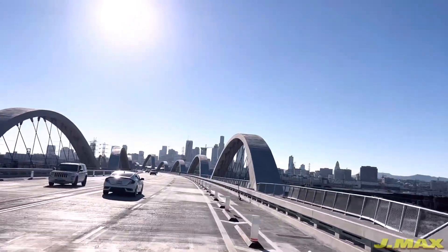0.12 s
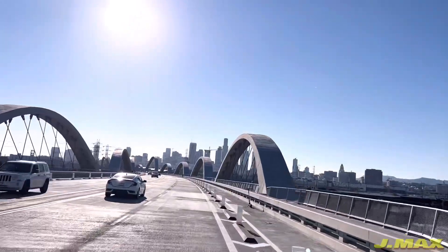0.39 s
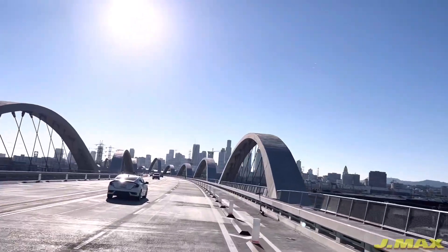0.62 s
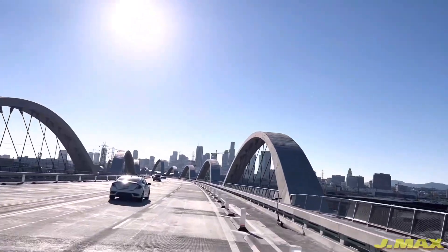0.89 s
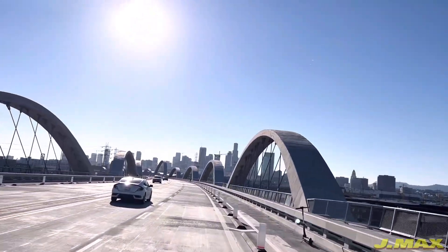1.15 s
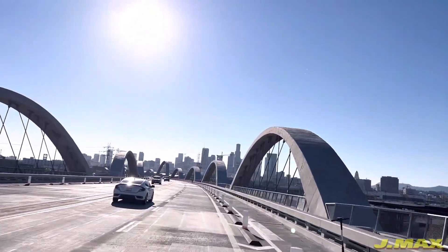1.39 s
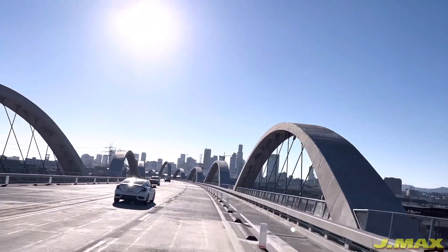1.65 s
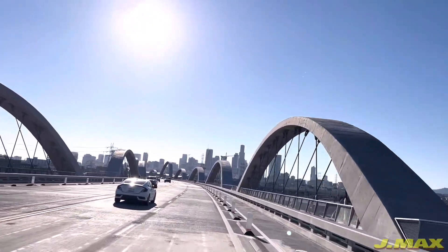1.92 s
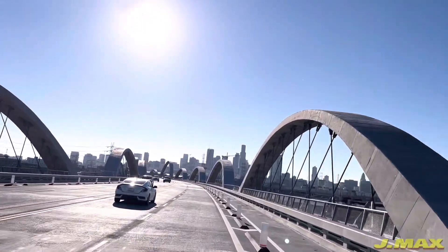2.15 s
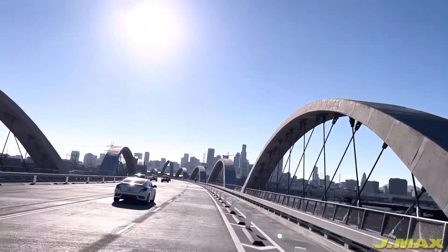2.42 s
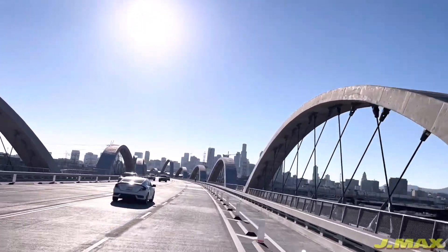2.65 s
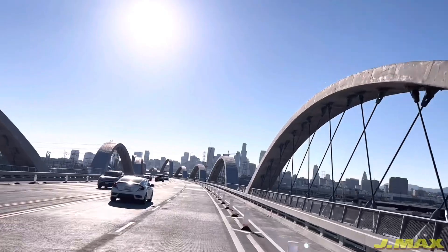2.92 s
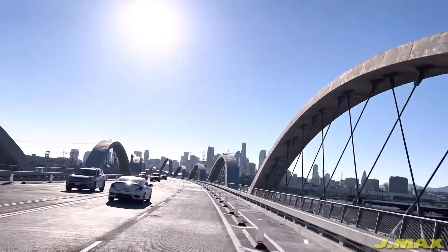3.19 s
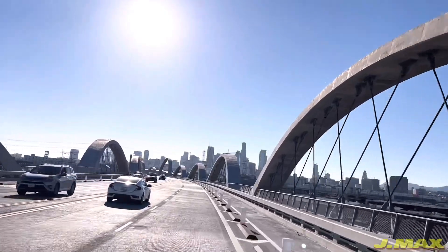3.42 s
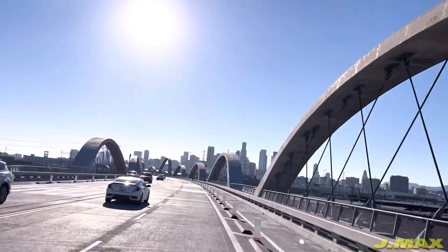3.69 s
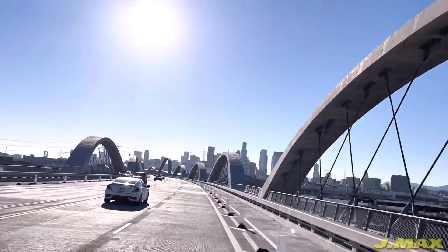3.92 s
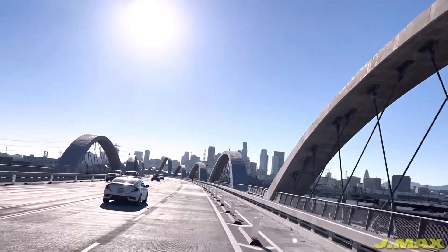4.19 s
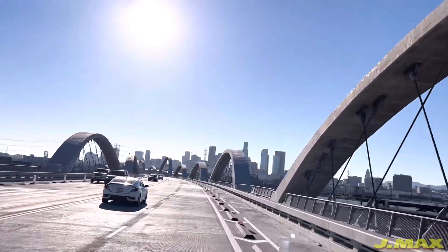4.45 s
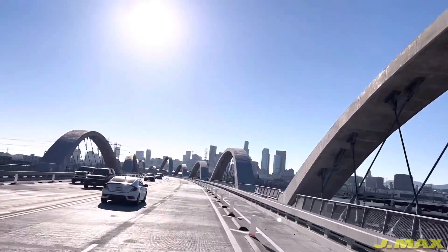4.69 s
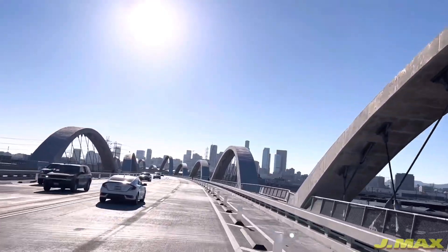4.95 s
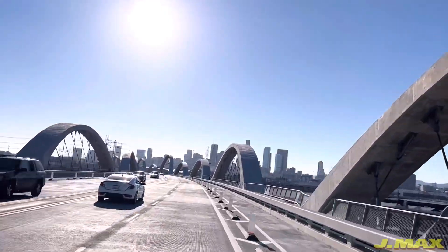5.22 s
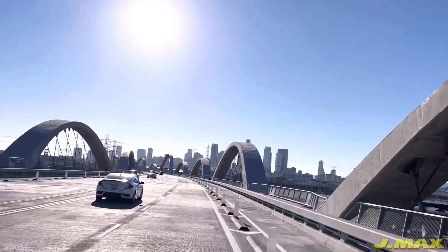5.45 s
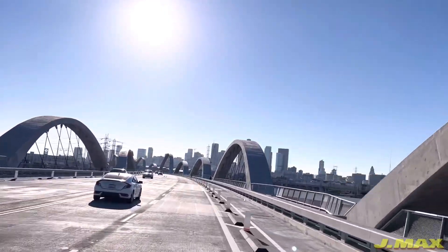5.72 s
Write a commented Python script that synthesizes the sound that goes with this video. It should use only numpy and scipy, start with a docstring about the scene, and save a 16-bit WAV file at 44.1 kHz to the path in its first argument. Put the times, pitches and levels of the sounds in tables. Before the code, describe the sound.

For nearly six seconds, wind streams across a small two-port microphone on a car driving at steady speed over an open bridge. Deep rumble and ragged low-mid buffeting dominate, very close and without audible echo. Underneath lie quiet, smooth tyre and air hiss and faint, unsteady narrow whistles that sink slightly around 1.4 to 1.8 s and climb towards 2.8 s. Irregular bass lumps thump from the start, with a cluster of puffs and clicks at 0.5 to 0.7 s; the bass briefly drops near 1.0 s. Thuds gather from 1.5 s. Around 2.8 s a strong gust swells, the hiss brightens, and thuds, puffs and crackles crowd together until about 3.6 s while the bass begins to spread across the stereo field. Another heavy rumble comes near 3.9 s, with short dips around 4.3 s. Activity thins around 4.7 to 5.1 s, then dull thuds return and the wind continues to the end.

```python
"""Wind streams over a two-port microphone on a car crossing a bridge at steady speed.
From the start, shaped noise gives a centred bass rumble, buffeting, tyre and air hiss and faint edge whistles.
Large eddies soon thud as single bass lumps; small ones burst on the ports as puffs of noise and clusters of
clicks, and middle-sized ones land as dull thuds. The final stage keeps the bass centred, and from about 2.7 s
lets it widen between the channels."""
import sys
import numpy as np
from scipy import signal
from scipy.fft import rfft, irfft, next_fast_len
from scipy.io import wavfile
from scipy.ndimage import uniform_filter1d

SR = 44100
rng = np.random.default_rng(int(sys.argv[2]) if len(sys.argv) > 2 else 0)


def bounce(signal):
    """Save signal as a 16-bit WAV file at the path given by the first command-line argument."""
    frames = np.transpose(np.atleast_2d(signal))
    limited = np.clip(frames, -1, 1)
    pcm = np.round(limited * 32767).astype(np.int16)
    wavfile.write(sys.argv[1], SR, pcm)


def volts_from_db(level):
    """Convert decibel levels to linear amplitude ratios."""
    exponent = np.asarray(level, float) / 20
    return 10 ** exponent


N = 257588
TIMES = np.arange(N) / SR   # s
SIZE = next_fast_len(N)
HZ = np.maximum(np.arange(SIZE // 2 + 1) * SR / SIZE, 1)
SWEEP_CYCLES = 1.179   # an eddy passes from small to large: each pitch comes this many of its own cycles late

# Spectrum of pressure from large eddies. Each row: frequency in Hz, relative density in dB per Hz.
RUMBLE_SPECTRUM = [(12, -44), (20, -24), (46, 1), (70, 5), (94, 2), (221, -10.5), (300, -14), (390, -16),
                   (660, -120)]
# Strong eddies bursting on the ports. Each row: time in seconds, puff level in dB at 800 Hz,
# puff brightness in dB per octave, snap level in dB, crack level in dB (both before single clicks are scaled).
EDDY_BURSTS = [(0.125, -31, -1, -19, -34), (0.347, -34, -2, -14, -35), (0.529, -43, -10, -34, -25),
               (0.575, -44, 12, -38, -33), (0.61, -30, 4.5, -23, -32), (0.641, -27, -2, -18, -36),
               (0.724, -22.5, -4.5, -18, -24), (1.198, -24.5, -2.5, -29, -37), (1.293, -29, 4, -30, -35),
               (1.673, -39, -4, -12, -40), (1.717, -30, -11, -14, -41), (1.815, -30, 0, -13, -40),
               (1.939, -28, -8, -16.5, -47), (2.248, -24, 0, -20, -30), (2.473, -18, -1, -22, -29),
               (2.606, -19, -1, -28, -16), (2.765, -28, -8, -7, -30), (2.869, -24, -9, -11, -20),
               (2.911, -21, -0.5, -14, -32), (2.982, -42, -5, -13, -36), (3.097, -22, -1, -25, -32),
               (3.174, -33, -15, -20, -22), (3.257, -22, -1.5, -16, -14.5), (3.322, -41, -16, -12.5, -25),
               (3.419, -26, 5, -20, -25), (3.491, -20, -3, -26, -37), (3.555, -25.5, 1, -20, -28),
               (3.73, -26, 1.5, -20, -40), (3.854, -31, -6, -29, -36), (3.914, -25.5, -6, -9, -16),
               (4.148, -28, -6, -12, -20), (4.3, -24, -5, -9.5, -27), (4.362, -28, 2, -23, -32),
               (4.374, -40, 10, -6, -17), (4.49, -46, 12, -23, -27), (4.595, -29.5, 5, -10, -19.5),
               (4.968, -24, -3, -19.5, -32), (5.126, -33, -8, -26, -34), (5.288, -35, -14, -17, -35),
               (5.436, -25.5, -3, -35, -35), (5.687, -25.5, -8.5, -16.5, -33)]


def rms_one(x):
    """Normalisation: scale to rms 1."""
    return x / np.sqrt(np.mean(x ** 2) + 1e-20)


def at_hz(points):
    """Spectral envelope: a table interpolated on a log-frequency axis."""
    hz, value = np.transpose(points)
    return np.interp(np.log(HZ), np.log(hz), value)


def drift(corner_hz):
    """Low-passed noise of spread 1: two equal one-pole filters, run in, at a twentieth of the sample rate."""
    pole = np.exp(-40 * np.pi * corner_hz / SR)
    noise = rng.standard_normal(N // 20 + 2002)
    slow = signal.lfilter([1], [1, -2 * pole, pole * pole], noise)[2000:]
    return np.interp(np.arange(N) / 20, np.arange(len(slow)), rms_one(slow))


def octave_band(centre_hz, size=1):
    """Filter bank: overlapping bands, `size` octaves apart, whose gains add up to one."""
    distance = np.clip(np.log2(HZ / centre_hz) / size, -1, 1)
    return np.cos(np.pi / 2 * distance) ** 2


def bump(s, width_s, rise=1):
    """Gaussian pulse of height 1 and standard deviation width_s; its rising side is scaled by `rise`."""
    out = np.zeros(N)
    near = slice(max(round((s - .1) * SR), 0), round((s + .1) * SR))
    late = np.arange(near.start, min(near.stop, N)) / SR - s
    out[near] = np.exp(-.5 * (late / np.where(late < 0, rise, 1) / max(width_s, .002)) ** 2)
    return out


def sweep(middle_hz):
    """Dispersion: from 0.3 to 4 times the middle pitch, low pitches are delayed and high ones hastened."""
    ratio = np.clip(HZ / middle_hz, .3, 4)
    return np.exp(-2j * np.pi * SWEEP_CYCLES * (np.log(ratio) - HZ / middle_hz))


def on_channels(near, other):
    """Partial coherence: the channels share one sound, shifted in phase; the right adds an unrelated one."""
    # Likeness of the channels: that of the two ports up to 9.5 kHz; above, mostly nearly alike, with the
    # phase flat over whole bands. Each row: frequency in Hz, likeness from 0 to 1, lead of the right in radians.
    channel_coherence = [(250, .97, .01), (400, .45, .5), (700, .33, 3.0), (1150, .82, 5.1),
                         (1500, .2, 6.4), (2000, .42, 7.3), (2500, .2, 6.7), (2750, .3, 9.4),
                         (3100, .22, 10.3), (3550, .35, 12.0), (4100, .6, 12.1), (4650, .35, 12.3),
                         (4950, .2, 13.5), (5400, .35, 15.2), (5750, .1, 18.5), (6500, .45, 18.1),
                         (7200, .1, 21.5), (8400, .55, 24.9), (9500, .4, 27.3), (9700, .97, 28.2),
                         (10800, .97, 28.3), (11100, .5, 30.0), (11600, .95, 31.3), (12800, .95, 31.5),
                         (13200, .96, 34.5), (14500, .96, 34.6), (14800, .5, 36.2), (15100, .95, 37.7)]
    # Balance of the channels. Each row: frequency in Hz, level of the left over the right in dB.
    channel_balance = [(300, -0.5), (600, -0.2), (1000, 0.5), (2000, -3.5), (4000, -2), (5500, -0.2),
                       (8000, -2.5), (12000, -0.5)]
    hz, alike, lead = np.transpose(channel_coherence)
    alike, lead = np.interp(HZ, hz, alike), np.interp(HZ, hz, lead)
    left, unrelated = rfft(near, SIZE), rfft(other, SIZE)
    right = alike * left * np.exp(1j * lead) + np.sqrt(1 - alike ** 2) * unrelated
    return np.array([left, right]) * volts_from_db(at_hz(channel_balance) * [[.5], [-.5]])


def channel_noise():
    """Partly coherent noise: spectra of white noise on the two channels."""
    return on_channels(*rng.standard_normal((2, SIZE)))


def coloured(trains, spectrum, phase=1):
    """Impulse response: clicks take on a colour, of peak 1 if undispersed, and reach both channels."""
    colour = volts_from_db(at_hz(spectrum))
    return irfft(on_channels(*trains) * colour * phase, SIZE)[:, :N] / irfft(colour, SIZE)[0]


def scattered(level_db, per_s, spread_db):
    """Random point process: clicks at chance moments, mostly small, a few large."""
    born = rng.random(N) < per_s / SR
    sizes = volts_from_db(level_db + spread_db * np.minimum(rng.exponential(1, N), 3))
    return born * sizes * rng.choice([-1, 1], (2, N))


def rumble(level_db):
    """Near-field coherence: large eddies press on both ports almost alike, with their swell partly evened."""
    evenness, apart_db, pan_db = 0.22, -19, -1.4   # exponent; difference signal; left over right
    white = rng.standard_normal((2, SIZE))
    mid, side = irfft(rfft(white) * volts_from_db(at_hz(RUMBLE_SPECTRUM)), SIZE)[:, :N]
    mid = rms_one(mid)
    power = uniform_filter1d(uniform_filter1d(mid ** 2, size=1800), size=1800)
    swell = np.sqrt(power + .01)
    mid = rms_one(mid / swell ** evenness)
    apart = volts_from_db(level_db + apart_db) * rms_one(side) * [[1], [-1]]
    both = lumps(mid * volts_from_db(level_db)) + apart
    return both * volts_from_db(pan_db * np.array([[.5], [-.5]]))


def buffeting(level_db):
    """Turbulent pressure: small eddies modulate noise band by band, and strong ones add short puffs."""
    # Spectrum of the buffeting. Each row: frequency in Hz, relative density in dB per Hz.
    buffet_spectrum = [(120, -4.5), (200, -3), (400, 0.5), (750, 1.5), (1000, -2), (1400, -6.5),
                       (2000, -15.5), (2600, -21.5), (2750, -25), (3200, -27.5), (5000, -60), (9000, -70)]
    # Colour of the buffeting. Each row: time in seconds, brightness in dB per octave around 800 Hz.
    buffet_brightness = [(0, 1), (1, 1.5), (2, -0.5), (3, 0.5), (3.5, 2), (4.301, 0), (5, 0), (5.84, 2.2)]
    shared_db, own_db, side_db = 0.22, 2.5, 0.97   # swell of all bands, of each band, of each port
    puff_s, puff_lag_s = 0.012, 0.0026   # standard deviation of the fall; centre after the listed time
    puff_rise, dullest_octave = .45, -1.2   # rise as a share of the fall; puff tilt stops this far from 800 Hz
    colour = channel_noise() * volts_from_db(at_hz(buffet_spectrum))
    norm = np.sqrt(np.mean(irfft(colour, SIZE) ** 2))
    gusts = shared_db * (drift(30.0) + 0.22 * drift(34.0))
    sides = side_db * np.array([drift(51.0), drift(13.0)])   # an eddy reaches one port more than the other
    tilt = np.interp(TIMES, *np.transpose(buffet_brightness))
    s, puff_db, puff_tilt_db = np.transpose(EDDY_BURSTS)[:3]
    bells = np.array([bump(at + puff_lag_s, puff_s, puff_rise) for at in s])
    out = 0
    for octave in np.arange(-3, 4, .5):
        centre_hz = 800 * 2. ** octave
        puffs = volts_from_db(puff_db + puff_tilt_db * max(octave, dullest_octave)) @ bells
        own_swell_db = (own_db - 0.68 * octave) * drift(17.5)
        gain = volts_from_db(level_db + tilt * octave + gusts + own_swell_db) + puffs
        gain = np.roll(gain, round(SWEEP_CYCLES * SR / centre_hz))   # low bands swell later
        band = irfft(colour * octave_band(centre_hz, size=.5), SIZE)[:, :N]
        out = out + gain * volts_from_db(sides) * band / norm
    return out


def hiss(level_db):
    """Broadband flow noise: tyres and air give smooth bright noise that flickers a little, band by band."""
    # Spectrum of the hiss. Each row: frequency in Hz, relative density in dB per Hz.
    hiss_spectrum = [(1200, -20), (2200, -3), (2600, 0), (2850, -2), (3300, -1.5), (4200, -2), (5300, -1.5),
                     (6500, -3), (7200, -5.5), (9000, -6.5), (10000, -10), (11300, -11), (12300, -15.5),
                     (13500, -18), (15750, -19.5), (15850, -80)]
    flicker_db, shared = 1.2, .35   # flicker of each band; relative amount common to all bands
    sheen_follows, sheen_flicker_db = 0.42, 0.45   # from 9 kHz up: extra share of the level's swing; flicker
    colour = channel_noise() * volts_from_db(at_hz(hiss_spectrum))
    together = drift(8.4)
    sheen_db = sheen_follows * (level_db - level_db.mean()) + sheen_flicker_db * drift(7.6)
    out = 0
    for half_octave in range(8):
        centre_hz = 1600 * 2. ** (half_octave / 2)
        gain_db = flicker_db * (shared * together + drift(23.0)) + sheen_db * (half_octave > 4)
        out = out + volts_from_db(gain_db) * irfft(colour * octave_band(centre_hz, size=.5), SIZE)[:, :N]
    return rms_one(out) * volts_from_db(level_db)


def whistles():
    """Edge tones: three narrow, unsteady strands slide together with the speed of air over an edge."""
    # Edge whistle. Each row: time in seconds, main pitch in Hz, level of the main and upper strands in dB,
    # level of the lower strand in dB (both before a common lift).
    whistle_curve = [(0, 4950, -66, -54), (.35, 4980, -62, -52), (.55, 4750, -60, -49.5),
                     (.65, 4900, -59, -51), (.8, 4780, -55.5, -52), (1.17, 4880, -55.5, -50.5),
                     (1.28, 4750, -54, -53), (1.42, 4530, -51.5, -64), (1.62, 4520, -51.5, -63),
                     (1.85, 4550, -53, -60), (2.1, 4680, -53, -56), (2.3, 4750, -57, -56),
                     (2.45, 4900, -57, -57), (2.72, 5300, -60, -55), (2.84, 5600, -59, -51.5),
                     (3.0, 5450, -59, -52), (3.15, 5350, -59, -52), (3.8, 5300, -61, -57),
                     (4.05, 5500, -60, -56), (4.4, 5250, -62, -60), (4.8, 5450, -59, -59),
                     (5.84, 5380, -59, -59)]
    # Upper strand. Each row: time in seconds, level against the main strand in dB.
    upper_strand = [(0, -8), (1.2, -6), (1.5, -14), (2.3, -13), (2.7, 2), (5.84, -7)]
    lower, upper = .77, 1.22   # pitch ratios of the side strands
    waver, width_hz = .013, 80   # spread of the pitch as a share; how fast each strand loses its phase
    s, *columns = np.transpose(whistle_curve)
    hz, main_db, lower_db = [np.interp(TIMES, s, column) for column in columns]
    upper_db = main_db + np.interp(TIMES, *np.transpose(upper_strand))
    turns = np.cumsum(hz * (1 + waver * drift(25.93))) / SR
    out = 0
    for ratio, db in [(lower, lower_db), (1, main_db), (upper, upper_db)]:
        wobble = np.array([drift(width_hz) + 1j * drift(width_hz) for channel in range(2)])
        strand = np.real(wobble * np.exp(2j * np.pi * ratio * turns))
        out = out + strand * volts_from_db(db + 1.3 + 1.1 * drift(16.0))   # common lift, then flicker, in dB
    return irfft(on_channels(*out), SIZE)[:, :N]


def lumps(mid):
    """Dispersed pressure pulse: each large eddy is one falling swing that displaces the steady rumble."""
    # The largest eddies. Each row: time in seconds, peak level in dB before dispersion.
    large_eddies = [(0.054, -10), (0.216, -7.5), (0.426, -8), (0.482, -7), (0.516, -2.5), (0.556, -8),
                    (0.615, -6), (0.658, -7), (0.7, -8), (0.8, -7.5), (0.875, -8), (1.1, -6), (1.204, -4.5),
                    (1.423, -4.5), (1.55, -7.5), (1.659, -9.5), (1.732, -6), (1.863, -7), (1.917, -8),
                    (1.952, -4.5), (1.996, -6), (2.074, -3), (2.186, -7.5), (2.219, -4), (2.388, -10.5),
                    (2.556, -6.5), (2.598, -7), (2.763, -3.5), (2.806, -0.5), (2.88, -10), (2.957, -9),
                    (3.021, -4), (3.147, -3), (3.19, -9), (3.233, -7), (3.335, -7.5), (3.578, -5.5),
                    (3.641, -6), (3.877, -3), (3.916, -4), (3.952, -6), (4.039, -10), (4.126, -3),
                    (4.226, -3), (4.272, -4.5), (4.375, -6), (4.462, -8), (4.675, -4.5), (4.777, -5.5),
                    (4.915, -7), (5, -5.5), (5.225, -8), (5.472, -8), (5.536, -8.5), (5.625, -7),
                    (5.777, -3.5)]
    lump_s, lump_clears = 0.008, 0.72   # standard deviation; share of the steady rumble pushed aside
    s, db = np.transpose(large_eddies)
    train = np.zeros(N)
    train[(s * SR).astype(int)] = volts_from_db(db) * rng.choice([-1, 1], len(s))
    colour = volts_from_db(at_hz(RUMBLE_SPECTRUM))
    cleared = np.clip(1 - lump_clears * sum(bump(at, lump_s) for at in s), 0, 1)
    swings = irfft(rfft(train, SIZE) * colour * sweep(82.8), SIZE)[:N] / irfft(colour, SIZE)[0]
    return mid * cleared + swings


def snaps(level_db):
    """Impulsive excitation: an eddy breaking on a port clicks within milliseconds; small ones are random."""
    # Dull body of a click. Each row: frequency in Hz, relative density in dB per Hz.
    snap_spectrum = [(150, -15), (400, -1), (800, -14), (1400, 4.5), (2000, -10), (3000, -41)]
    # Bright crack of a click. Each row: frequency in Hz, relative density in dB per Hz.
    crack_spectrum = [(900, -20), (1600, -2), (2300, 0), (2800, -3), (3300, -9), (4300, -16), (5000, -48)]
    body_spread_s, crack_spread_s = 0.00602, .007   # the clicks of a burst scatter over these times
    s, _, _, body_db, crack_db = np.transpose(EDDY_BURSTS)
    offsets = rng.random((len(s), 2, 9)) ** 1.5
    heights = rng.uniform(-.8, .8, (len(s), 2, 9))
    offsets[:, :, 0], heights[:, :, 0] = .2, .9 * np.sign(heights[:, :, 0])   # one click is always strong

    def click_trains(spread_s, db):
        """Superposition: the clicks of every burst add up in each channel."""
        trains = np.zeros((2, N))
        for channel in range(2):
            at = ((s[:, None] + spread_s * offsets[:, channel]) * SR).astype(int)
            np.add.at(trains[channel], np.minimum(at, N - 1), heights[:, channel] * volts_from_db(db)[:, None])
        return trains

    body = click_trains(body_spread_s, body_db)
    crack = click_trains(crack_spread_s, crack_db)
    small = scattered(level_db - 10.0, per_s=63.0, spread_db=1.0)
    dull = coloured(body + small, snap_spectrum, sweep(1260))
    bright = coloured(crack + volts_from_db(5.5) * small, crack_spectrum)
    return dull + bright


def thuds(level_db):
    """Dispersed impulses: middle-sized eddies land as dull lumps falling in pitch, many small ones at random."""
    # Spectrum of a thud. Each row: frequency in Hz, relative density in dB per Hz.
    thud_spectrum = [(60, -7), (140, 7.5), (250, 10), (400, 7), (560, 2.5), (850, -47)]
    # The strongest thuds. Each row: time in seconds, peak level in dB before dispersion.
    strong_thuds = [(0.354, -19), (0.594, -9.5), (1.515, -14), (1.602, -14.5), (1.683, -8.5), (1.882, -11),
                    (1.943, -19), (2.166, -12), (2.237, -16), (2.48, -11), (2.588, -11), (2.789, -13),
                    (2.82, -7.5), (2.873, -8), (2.919, -7.5), (3.1, -6.5), (3.177, -7), (3.238, -7),
                    (3.28, -13), (3.325, -10.5), (3.419, -7), (3.563, -12), (3.862, -11), (4.203, -14),
                    (4.302, -7.5), (4.382, -13), (4.416, -15), (4.599, -9), (5.055, -28), (5.136, -21),
                    (5.232, -15), (5.296, -8), (5.378, -14), (5.441, -21), (5.5, -10), (5.613, -10),
                    (5.672, -16), (5.699, -8), (5.767, -14), (5.817, -10.5)]
    trains = scattered(level_db - 17.0, per_s=75.0, spread_db=5.5)
    s, db = np.transpose(strong_thuds)
    trains[:, (s * SR).astype(int)] += volts_from_db(db) * rng.choice([-1, 1], len(s))
    return coloured(trains, thud_spectrum, sweep(344))


def scene():
    """Superposition: all layers add up, the noise levels following the curves of the ride."""
    # The ride. Each row: time in seconds, rumble level in dB, buffeting level in dB, hiss level in dB.
    ride_levels = [(0, -21, -25, -42), (.35, -20, -24.5, -42.5), (.62, -18.5, -23.5, -40.5),
                   (.76, -19.5, -24, -42), (.93, -19, -23.5, -42.5), (1.3, -18.5, -24, -41.5),
                   (1.75, -19.5, -23, -44), (2.2, -19, -24, -42.5), (2.6, -19, -23, -40.5),
                   (2.7, -20, -23.5, -39.5), (2.8, -18, -19.5, -36.5), (2.95, -20, -22.5, -38.5),
                   (3.1, -18.5, -23.5, -38.5), (3.4, -18.5, -24, -40), (3.7, -20.5, -24.5, -39.5),
                   (3.9, -16, -22, -39), (4.25, -20.5, -22.5, -41), (4.7, -19.5, -23, -40.5),
                   (5.1, -21.5, -24.5, -40.5), (5.45, -23, -24, -39.5), (5.84, -18, -22.5, -40)]
    # Brief swings of the rumble, mostly dips. Each row: time in seconds, change of level in dB.
    rumble_swings = [(0.175, -6), (0.73, -6), (0.82, -8), (0.91, -2), (1.031, -22), (1.46, -8), (1.77, -11),
                     (2.03, -13), (2.42, -8), (2.671, -11), (3.11, 0), (3.54, -17), (3.72, -9), (4.0, -8),
                     (4.31, -20), (4.39, -18), (5.08, -9), (5.19, -2), (5.33, -2), (5.4, -11), (5.5, 3),
                     (5.56, -11), (5.66, -7), (5.72, -17)]
    swing_s, buffet_follows = 0.0093, 0.24   # standard deviation; share of a swing in the buffeting
    s, *columns = np.transpose(ride_levels)
    rumble_db, buffet_db, hiss_db = [np.interp(TIMES, s, column) for column in columns]
    swing_db = sum(db * bump(at, swing_s) for at, db in rumble_swings)
    rumble_db = rumble_db + swing_db
    buffet_db = buffet_db + buffet_follows * swing_db
    steady = rumble(rumble_db) + buffeting(buffet_db) + hiss(hiss_db) + whistles()
    return steady + snaps(buffet_db) + thuds(buffet_db)


def roll_off(x):
    """The treble ends steeply here."""
    return signal.sosfilt(signal.butter(12, 17120, fs=SR, output="sos"), x)


def record(dry):
    """Saturation and filtering: peaks are rounded, the top is cut and the bass is made alike in both channels."""
    # Both channels are the same below a sinking edge. Each row: time in seconds, edge in Hz.
    centred_below = [(0, 330), (2.7, 265), (2.75, 170), (3.7, 110), (3.8, 20), (5.84, 20)]
    low_pass = signal.cheby2(12, 60, 16500, fs=SR, output="sos")   # 60 dB down from 16.5 kHz
    left, right = signal.sosfilt(low_pass, 1.59 * np.tanh(dry / 1.61))
    mid = (left + right) / 2
    hz, s, side = signal.stft((left - right) / 2, SR, nperseg=2048)
    edge_hz = np.interp(s, *np.transpose(centred_below))
    kept = np.clip((hz[:, None] - edge_hz) / 60 + .5, 0, 1)   # fades in over 60 Hz
    side = signal.istft(side * kept, SR, nperseg=2048)[1][:N]
    return roll_off(np.array([mid + side, mid - side]))


dry = scene()
out = record(dry)
bounce(out)
```